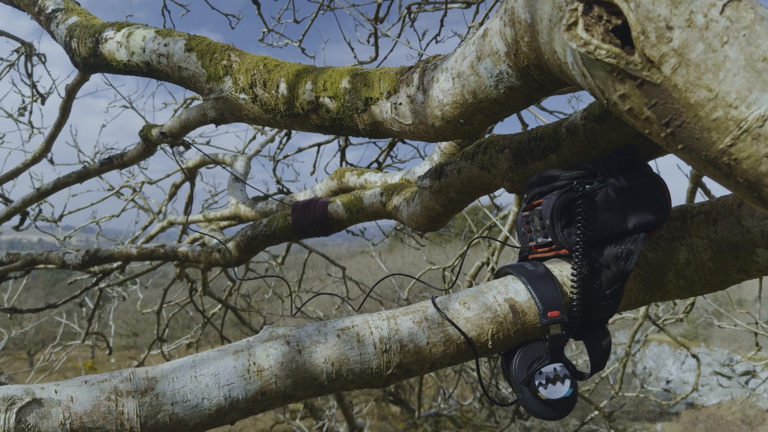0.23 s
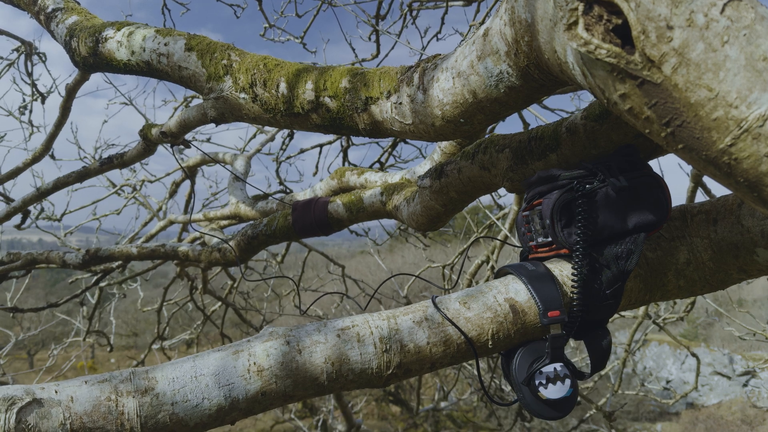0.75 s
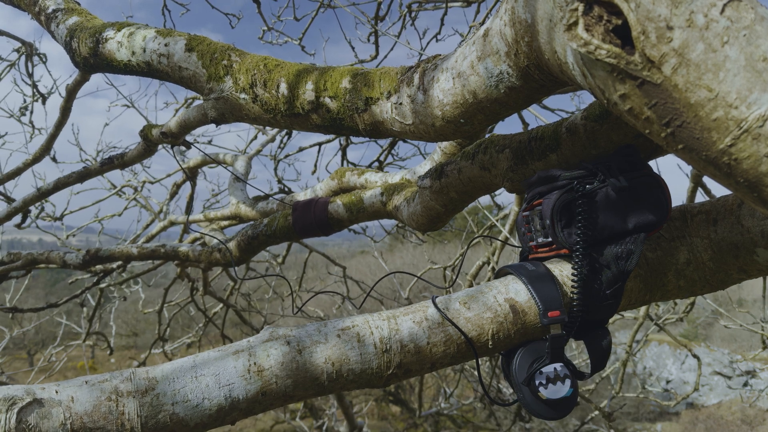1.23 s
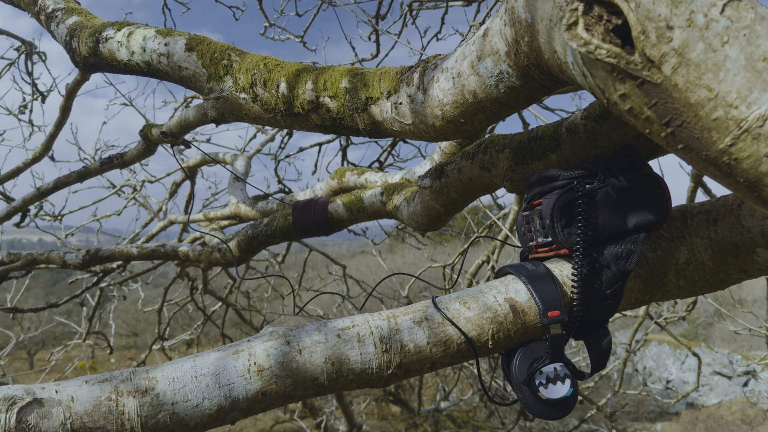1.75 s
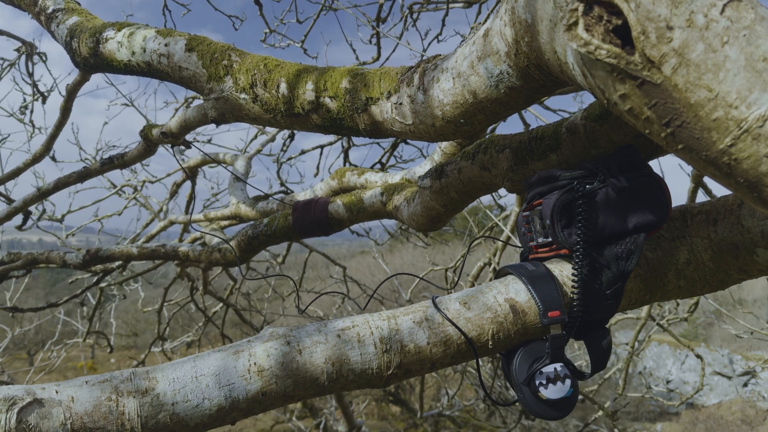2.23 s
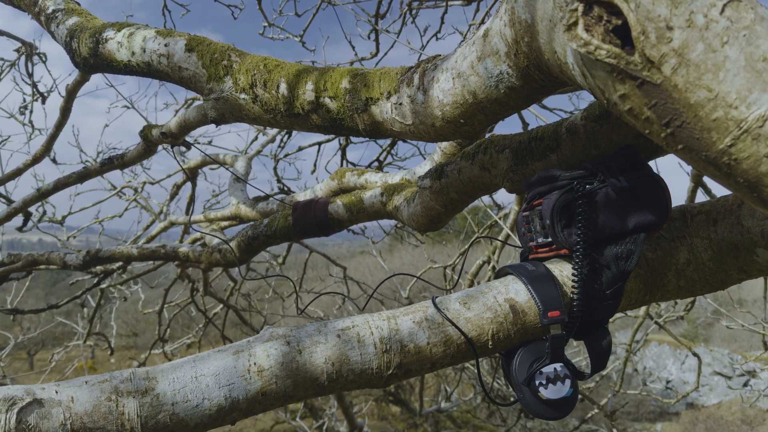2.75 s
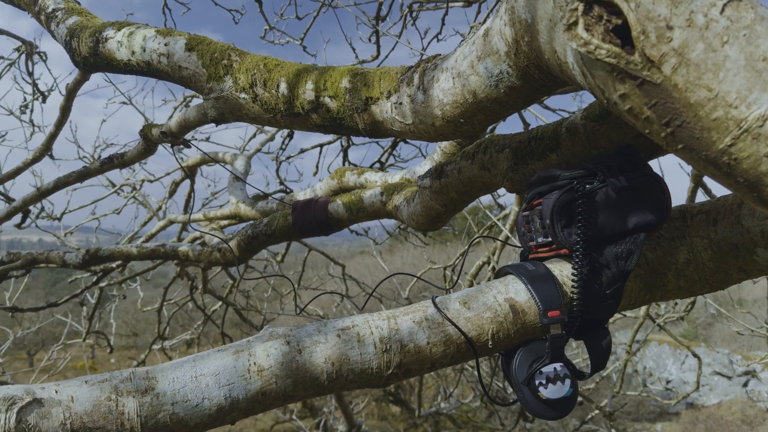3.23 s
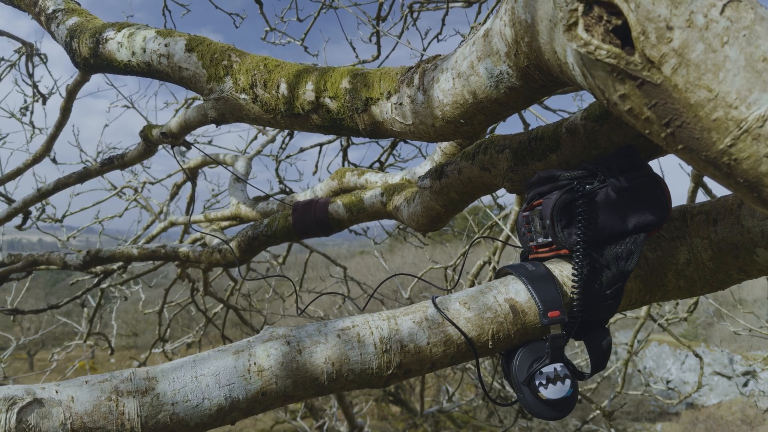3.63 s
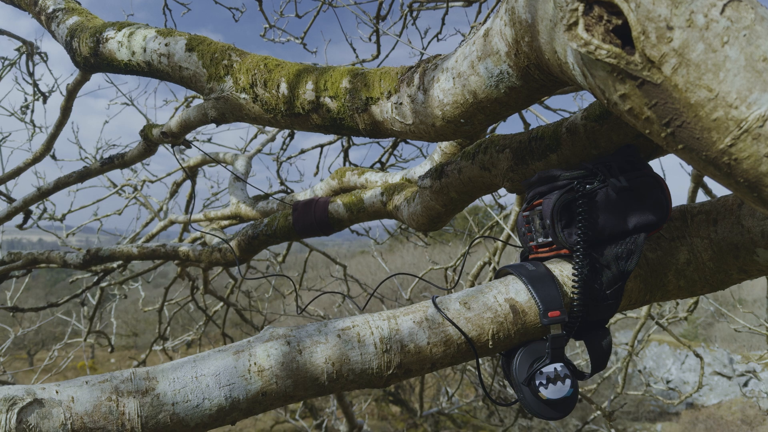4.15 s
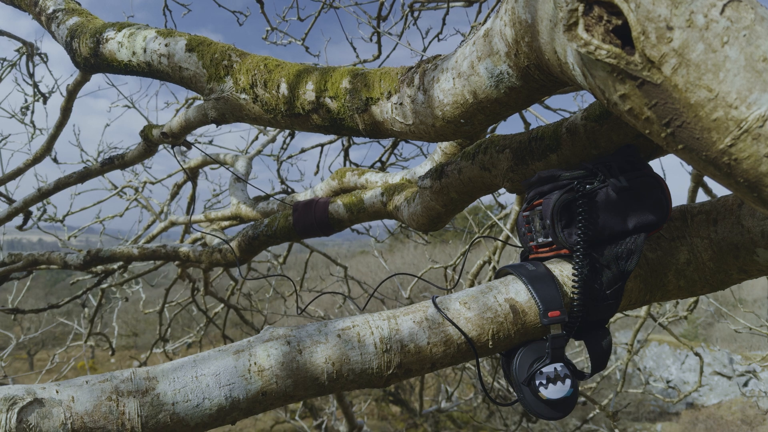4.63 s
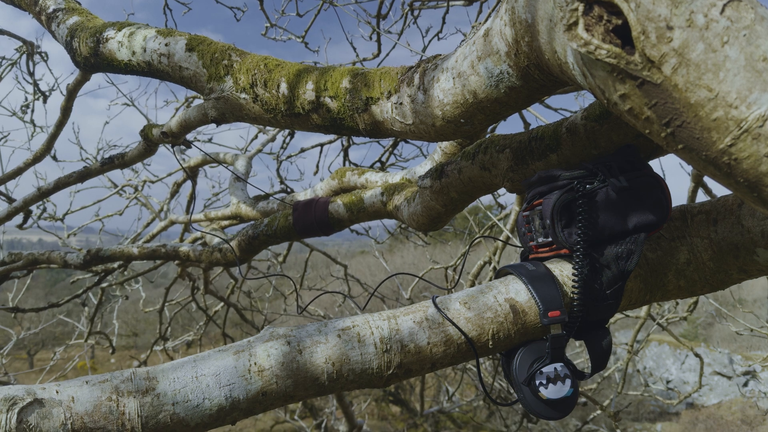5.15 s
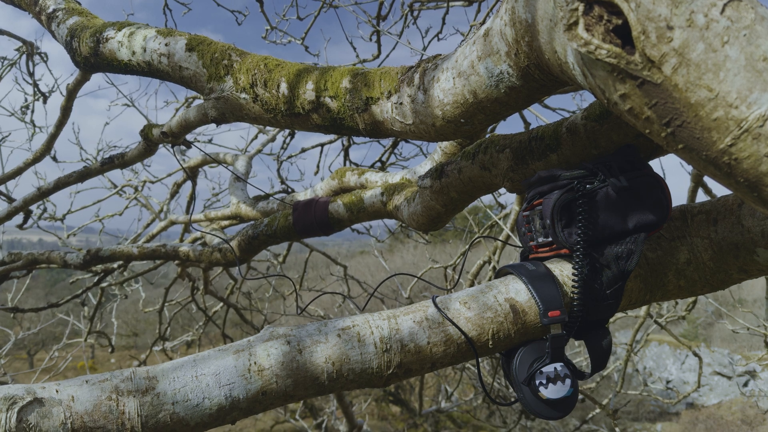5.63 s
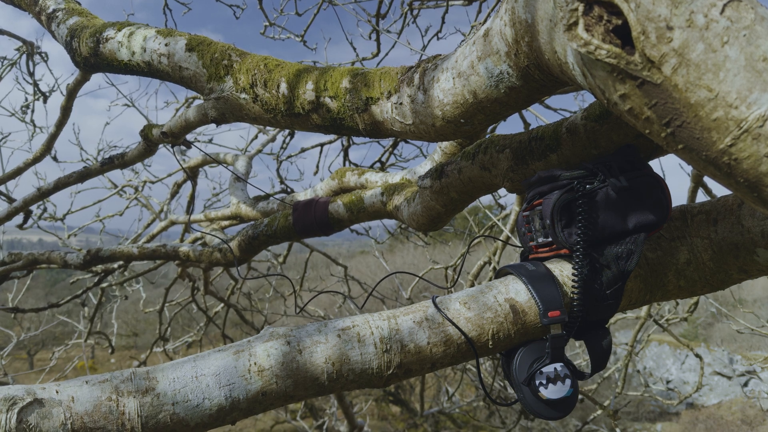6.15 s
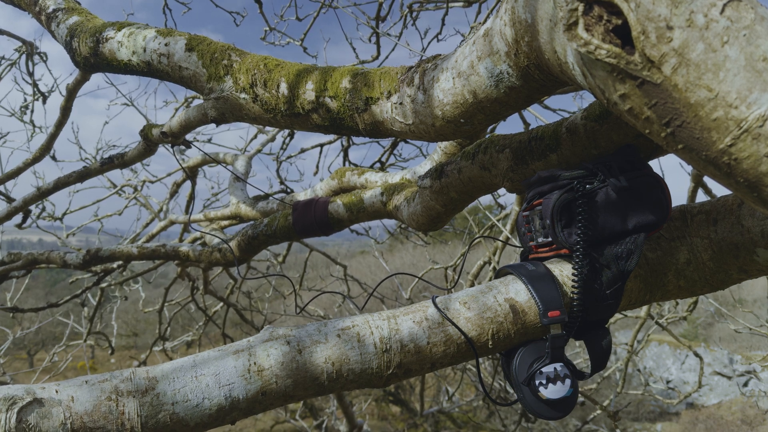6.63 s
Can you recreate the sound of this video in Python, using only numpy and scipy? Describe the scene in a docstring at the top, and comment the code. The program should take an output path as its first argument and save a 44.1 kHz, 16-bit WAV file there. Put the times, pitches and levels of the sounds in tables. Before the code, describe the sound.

A tree branch in gusty wind, heard through the wood: hollow twig knocks and rattles over a dull low rumble, gradually fading.

```python
"""Twigs knock and scrape over a low rumble: a branch in gusty wind, through a contact microphone.
Turbulent air bends the limb; twigs ring the wood's modes and air drags over the bark.
The microphone's strap ticks now and then, over faint amplifier hiss and whine.
A limiter catches the hardest knock, and the whole sound fades towards the end."""
import sys
import numpy as np
from scipy import signal
from scipy.io import wavfile
from scipy.ndimage import uniform_filter1d, minimum_filter1d

SR = 44100
rng = np.random.default_rng(int(sys.argv[2]) if len(sys.argv) > 2 else 0)


def waveform_to_disk(signal):
    """Save audio, clipped to [-1, 1], as 16-bit WAV at the path in sys.argv[1]."""
    frames = np.transpose(np.atleast_2d(signal))
    scaled = np.clip(frames, -1, 1) * 32767
    samples = np.round(scaled).astype(np.int16)
    wavfile.write(sys.argv[1], SR, samples)


N = 304290


def gain_of(db):
    return 10 ** (np.asarray(db) / 20)


def unit_rms(x):
    return x / np.sqrt(np.mean(x ** 2) + 1e-20)


def at_peak(x, db):
    return gain_of(db) * x / abs(x).max()


def curve(rows):
    """(time [s], value) rows interpolated to every sample."""
    return np.interp(np.arange(N) / SR, *np.transpose(rows))


def add(mix, start_s, sound):
    part = mix[round(start_s * SR):][:len(sound)]
    part += sound[:len(part)]


def smooth(x, span_s):
    span = round(span_s * SR)
    return uniform_filter1d(uniform_filter1d(x, span), span)


def steadied(x, span_s):
    """Evens out level swings slower than span_s; rms 1."""
    power = smooth(x ** 2, span_s)
    return unit_rms(x / np.sqrt(abs(power) + .05))


def noise(spectrum, patchy_db=0., size=1024):
    """Coloured noise with patches drifting in time and frequency; rms 1."""
    bin_hz = np.fft.rfftfreq(size, 1 / SR)
    hz, db = np.transpose(spectrum)
    real, imag, patches = rng.standard_normal((4 * N // size + 5, len(bin_hz), 3)).T
    patches = unit_rms(uniform_filter1d(uniform_filter1d(patches, 6, axis=0), 6, axis=1))
    colour_db = np.interp(np.log(bin_hz + 1), np.log(hz + 1), db, left=-120, right=-120)
    frames = (real + 1j * imag) * gain_of(colour_db[:, None] + patchy_db * patches)
    return unit_rms(signal.istft(frames, nperseg=size, noverlap=3 * size // 4)[1][:N])


def ring(modes, spread_db, samples=8000):
    """Decaying sines, low-passed above the top mode; the strike point randomises sign and size."""
    t = np.arange(samples) / SR
    hz, db, t60_s = np.transpose(modes)[:, :, None]
    luck = rng.standard_normal((len(modes), 2))
    envelopes = gain_of(db + spread_db * luck[:, :1] - 60 * t / t60_s)
    sound = (np.sign(luck[:, 1:]) * envelopes * np.sin(2 * np.pi * hz * t)).sum(0)
    return signal.sosfilt(signal.butter(6, 1.225 * hz.max(), fs=SR, output="sos"), sound)


# Hiss spectrum: (frequency [Hz], relative density [dB])
HISS_SPECTRUM = [(880, -27), (1500, 1), (1840, -1), (3000, -4), (4280, -8), (5800, -7.5), (6900, -5.5),
                 (7900, -8.5), (14700, -8.5), (16000, -9)]
# Whine harmonics 6-11: (rms before fade [dB])
WHINE_HARMONICS_DB = [-99, -98, -98.5, -96.5, -100, -99]
# Fade of hiss and whine: (time [s], gain [dB])
AMPLIFIER_FADE = [(0, 5), (4.5, 4), (6.9, -2)]


def amplifier(hiss_db=-71, whine_hz=500):
    """Electrical hiss and thin tones, sinking towards the end."""
    t = np.arange(N) / SR
    whine = sum(np.sqrt(2) * gain_of(db) * np.sin(2 * np.pi * (k * whine_hz * t + rng.random()))
                for k, db in enumerate(WHINE_HARMONICS_DB, start=6))
    hiss = gain_of(hiss_db) * noise(HISS_SPECTRUM, patchy_db=1.5)
    return gain_of(curve(AMPLIFIER_FADE)) * (hiss + whine)


# Rustle envelope: (time [s], level [dB])
RUSTLE_LEVEL = [(.08, -95), (.13, -74), (.2, -65.5), (.27, -66.5), (.36, -81), (.45, -94)]
# Rustle spectrum: (frequency [Hz], relative density [dB])
RUSTLE_SPECTRUM = [(2500, -4.5), (4000, -9), (6800, -2.5), (8500, -22.5), (12000, -49.5)]


def rustle():
    """A faint, high puff of noise in the first half second."""
    return gain_of(curve(RUSTLE_LEVEL)) * noise(RUSTLE_SPECTRUM, patchy_db=1, size=256)


# Taps: (time [s], peak [dB], pitch [Hz])
HARD_TAPS = [(0.3146, -42.5, 2440), (1.2959, -42, 2420), (1.8155, -45, 2410), (2.1665, -44.5, 3210),
             (2.3719, -44, 2440), (2.7241, -52, 2470), (3.5407, -39, 2370), (3.7978, -57, 2270),
             (3.9408, -53, 2740), (5.3357, -54, 2100), (5.7583, -59, 2190)]


def taps(attack_s=.00063, t60_s=.02):
    """A small hard part taps, ringing one short high mode."""
    out, t = np.zeros(N), np.arange(2000) / SR
    attack = np.sin(np.pi / 2 * np.minimum(t / attack_s, 1)) ** 2
    for time_s, db, hz in HARD_TAPS:
        tap = attack * ring([(hz, 0, t60_s)], spread_db=2, samples=len(t))
        add(out, time_s - .001, at_peak(tap, db))
    return out


# Sensor ring and woody bite: (frequency [Hz], relative level [dB], t60 [s])
SENSOR_MODES = [(6960, 6.5, 0.0056), (9180, -0.5, 0.0043)]
BITE_MODES = [(3900, 13, 0.0027), (4550, -1, 0.0077)]
# Ticks: (time [s], sensor peak [dB], click re sensor [dB], bite re sensor [dB])
STRAP_TICKS = [(0.682, -33, -13, -23), (0.6934, -52, -5, -17), (0.7225, -43.5, 4, -14),
               (0.7304, -44, -3, -7), (1.332, -50, -5, -28), (1.374, -29, -8, -32), (1.446, -39, -5, -10),
               (2.1474, -65, 2, -11.5), (2.2487, -50.5, -5, -26), (2.2644, -54, -10, -15),
               (2.3077, -51, -5, -22), (2.4864, -38.5, -7, -8), (2.5008, -39, -10, -30),
               (3.3844, -52, -7, -20), (3.476, -51.5, -10, -30), (3.8402, -47.5, 8, -5),
               (4.797, -47, -8, -2), (4.809, -52, 13, -15), (4.8546, -45, 8.5, -24), (5.7997, -57, -3, -21),
               (5.9732, -55, -5, -13)]


def strap_ticks(samples=2000):
    """The strap ticks: a wideband click, a woody bite and the sensor's ring."""
    out = np.zeros(N)
    click_band = signal.butter(2, [1800, 14500], "band", fs=SR, output="sos")
    click = signal.sosfilt(click_band, signal.unit_impulse(samples))
    for time_s, db, click_db, bite_db in STRAP_TICKS:
        sensor = ring(SENSOR_MODES, spread_db=5.5, samples=samples)
        bite = ring(BITE_MODES, spread_db=5, samples=samples)
        tick = at_peak(sensor, db) + at_peak(click, db + click_db) + at_peak(bite, db + bite_db)
        add(out, time_s + .00081, tick)
    return out


# Wood modes, 8 parts, thick to thin, each a list of (frequency [Hz], relative level [dB], t60 [s])
WOOD_PARTS = [
    [(199.1, -4, 0.12), (237.5, -6, 0.17)],
    [(294.3, -1.5, 0.082), (362.4, -2, 0.16), (402.4, -1, 0.081)],
    [(479.3, 4.5, 0.094)],
    [(548.5, 0, .13)],
    [(716, -2.5, 0.047), (779, -3.5, 0.071), (820.4, -3.5, 0.042)],
    [(1059, 5.5, 0.066), (1178, 6.5, 0.05)],
    [(1331, -1.5, .045), (1410, -1, 0.031)],
    [(1698, 6.5, 0.02), (1870, -6, 0.047)],
]
# Rattle drive per part: (relative level [dB])
RATTLE_DRIVE_DB = [-1.5, -2, -6.5, -5.5, -7, -34.5, -25, -37]
# Air on bark: (frequency [Hz], relative density [dB])
BARK_AIR_SPECTRUM = [(190, -38.5), (320, -12), (361, -1.5), (544, -2.5), (650, -8), (772, -1.5), (830, -9),
                     (1000, -25), (1400, -38.5), (1840, -46), (3500, -59), (5500, -68.5), (6900, -57),
                     (8200, -64.5), (10000, -94)]
# Wind strength, drives rattle and groan: (time [s], level [dB])
WIND_LEVEL = [(0.0, -31), (0.27, -32.5), (0.35, -31), (0.92, -34), (1.09, -34.5), (1.32, -35), (1.52, -31),
              (1.84, -35), (2.56, -36), (3.02, -40.5), (3.71, -38.5), (3.86, -39.5), (4.24, -43.5),
              (4.59, -43.5), (5.09, -45.5), (5.73, -47.5), (6.07, -51.5), (6.42, -44.5), (6.59, -53),
              (6.9, -53)]


def twig_rattle(hits_per_s=250, flurry_db=2.5, flurry_s=.03):
    """Wind shakes small twigs against the wood in flurries and drags over the bark."""
    wood = np.zeros(N)
    for modes, db in zip(WOOD_PARTS, RATTLE_DRIVE_DB):
        for mode in modes:
            size, chance = rng.random((N, 2)).T
            strength = gain_of(-3.2 * np.log(size + .011))  # many soft, a few hard
            hits = strength * (chance < hits_per_s / SR)
            wood += gain_of(db) * signal.oaconvolve(hits - hits.mean(), ring([mode], spread_db=5))[:N]
    flurries = unit_rms(smooth(rng.standard_normal(N), flurry_s))
    envelope = gain_of(curve(WIND_LEVEL) + flurry_db * flurries)
    air = noise(BARK_AIR_SPECTRUM, patchy_db=5.5)
    return envelope * (gain_of(-1) * unit_rms(wood) + gain_of(-3.5) * air)


# Limb spectra: (frequency [Hz], relative density [dB])
SWAY_SPECTRUM = [(8, 1), (26, 4.5), (40, 5.5), (52, -26), (70, -44)]
SHUDDER_SPECTRUM = [(40, -28.5), (56, -19), (68, 2), (80, -1), (100, -5), (110, -3.5), (119, 6), (128, -4),
                    (140, -7.5), (160, -8.5), (200, -32)]
GROAN_SPECTRUM = [(88, -46.5), (150, 3.5), (215, 0), (320, -13), (420, -49.5), (700, -120)]
# Slow bending and faster shudder: (time [s], level [dB])
SWAY_LEVEL = [(0.0, -52), (0.09, -18.5), (0.15, -26), (0.48, -21), (0.52, -33), (0.88, -21.5), (1.04, -43),
              (1.31, -28), (1.4, -36), (1.44, -19.5), (1.54, -40), (1.71, -22), (1.77, -32.5), (2.13, -36),
              (2.25, -17.5), (2.48, -37), (2.71, -24), (2.82, -36), (3.15, -40), (3.19, -30.5), (3.63, -41),
              (3.67, -26.5), (3.82, -43), (3.88, -26.5), (4.11, -39), (4.59, -33.5), (4.78, -42.5),
              (5.94, -44), (6.09, -37), (6.9, -41.5)]
SHUDDER_LEVEL = [(0.0, -26), (0.33, -27.5), (1.25, -28), (1.65, -24), (1.67, -33.5), (1.84, -26.5),
                 (1.92, -34.5), (2.29, -22), (2.38, -35), (2.61, -23.5), (2.73, -35), (2.84, -28.5),
                 (3.15, -37), (3.27, -27), (3.5, -36), (3.55, -26), (3.98, -35.5), (4.57, -33),
                 (4.77, -42.5), (4.88, -29.5), (4.94, -38.5), (5.25, -43), (5.4, -31), (5.51, -38.5),
                 (6.27, -44), (6.53, -33), (6.67, -43.5), (6.9, -38.5)]


def limb():
    """Turbulent air bends the limb: it sways, shudders and groans."""
    sway = gain_of(curve(SWAY_LEVEL)) * steadied(noise(SWAY_SPECTRUM, size=8192), span_s=.091)
    shudder = gain_of(curve(SHUDDER_LEVEL)) * steadied(noise(SHUDDER_SPECTRUM, size=8192), span_s=.057)
    groan_db = -39.5 + 1.5 * (curve(WIND_LEVEL) + 40)
    groan = gain_of(groan_db) * noise(GROAN_SPECTRUM, patchy_db=3, size=2048)
    return sway + shudder + groan


def twig_contact(rise_ms, hold_ms, parts, peaks_db, slips_per_s):
    """A first touch, then random slips building to a main blow and trailing off; all ring the wood."""
    ms = np.arange(4000) / SR * 1000
    size, chance = rng.standard_normal(len(ms)), rng.random(len(ms))
    blow_ms, trail_ms = max(rise_ms - 5, 0), max(.93 * hold_ms - 2, 1)
    build = .49 + .99 * ms / (blow_ms + 1e-3)
    trail = np.exp(-((ms - blow_ms) / trail_ms) ** 2)
    force = np.where(ms < blow_ms, build, trail)
    slips = .7 * size * force * (chance < slips_per_s / SR)
    slips[0] = .75  # first touch
    slips[round(blow_ms * SR / 1000)] = 1
    return sum(at_peak(signal.fftconvolve(slips, ring(modes, spread_db=.5)), db)
               for modes, db in zip(parts, peaks_db))


# Clacks: (time [s], contact [ms], middle part's peak [dB], tilt per thinner part [dB])
TIP_CLACKS = [(0.118, 8, -53, 6), (0.146, 6.8, -38.5, 0.5), (0.172, 21.6, -53, -11), (0.233, 4.2, -46, 2),
              (0.402, 16, -34.5, -1.5), (0.63, 17, -36, -5), (0.734, 7, -52, 3.5), (0.818, 12, -53, 3),
              (0.881, 27, -43.5, -4), (0.941, 7, -47.5, 0.5), (1.136, 6.4, -54, 6), (1.232, 23, -50, -4.5),
              (1.299, 13, -60, -8), (1.336, 17, -49.5, -5), (1.435, 14, -51, 2), (1.76, 17, -55, -13),
              (2.1673, 5.8, -23.5, 2), (2.257, 14, -45, -1), (2.277, 8.4, -34.5, -4), (2.287, 12, -52, -16),
              (2.47, 8.4, -49, 7), (2.578, 11.5, -44.5, -4), (2.675, 8.8, -47, -3), (2.698, 11.5, -45, -4),
              (2.727, 17.6, -43.5, -4.5), (3.015, 7, -59, -2), (3.189, 18, -57, 2), (3.22, 11, -51, -5),
              (3.278, 23, -45, -5), (3.305, 14, -57, 0), (3.54, 10, -55.5, 2.5), (3.655, 10, -54, -7),
              (3.744, 16, -54.5, 0), (3.796, 13, -53, -2), (3.943, 9.4, -54, 9), (4.197, 20, -55.5, 3),
              (4.488, 9, -47, -1), (5.337, 3.3, -43.5, 0)]


def tip_clacks():
    """Hard twig tips ring the three thin parts of the wood."""
    out = np.zeros(N)
    for time_s, contact_ms, db, tilt_db in TIP_CLACKS:
        peaks_db = db - tilt_db, db, db + tilt_db
        clack = twig_contact(.48 * contact_ms, contact_ms, WOOD_PARTS[5:], peaks_db, slips_per_s=650)
        add(out, time_s, clack)
    return out


# Gains by strike spot: (deep thud [dB], thud [dB], low hollow note [dB], high hollow note [dB])
SPOT_GAINS_DB = {"base": [0.5, -22, -6.5, -4.5], "low": [-12.5, -13.5, 2, -8.5], "high": [-29.5, -11.5, -10,
                 -0.5], "fork": [-14.5, -13.5, 0.5, 4], "side": [-6.5, -5, -15.5, -12], "broad": [-0.5, -3,
                 -2, -13.5], "bend": [-10.5, -6, -22, 0]}
# Knocks: (time [s], rise [ms], hold [ms], spot, ring peak before spot gain [dB], dry knock peak [dB])
TWIG_KNOCKS = [(0.006, 8.5, 8.4, "side", -17, -23), (0.162, 4, 6.1, "low", -13.5, -26),
               (0.18, 4, 7.4, "low", -21, -15.5), (0.205, 20, 14, "fork", -19.5, -26.5),
               (0.244, 12, 22, "base", -16, -21.5), (0.288, 20, 35.4, "fork", -14.5, -24.5),
               (0.403, 5.2, 40, "side", -17, -23), (0.518, 16, 16, "low", -24, -22),
               (0.549, 24, 29, "low", -29, -33), (0.66, 14.3, 21, "broad", -21, -28),
               (0.733, 7.3, 8.6, "broad", -18.5, -22.5), (0.779, 8.1, 14, "base", -23.5, -36),
               (0.827, 9.1, 13, "side", -17, -21), (0.898, 3.9, 6.7, "high", -11, -22.5),
               (0.927, 11.8, 22, "low", -18.5, -28.5), (0.96, 8, 20, "high", -18.5, -46),
               (1.014, 15, 26, "fork", -28, -32), (1.159, 5.4, 9, "bend", -31, -23.5),
               (1.296, 6.9, 5.4, "base", -18.5, -21), (1.352, 12.8, 53, "side", -17, -29),
               (1.45, 16, 16, "base", -25, -42), (1.477, 6.06, 11, "fork", -22.5, -27),
               (1.617, 17.3, 18, "high", -15, -28), (1.68, 12, 5.1, "low", -20.5, -29.5),
               (1.817, 5.5, 6, "base", -13.5, -21), (2.094, 7.9, 7.8, "side", -19.5, -33.5),
               (2.1705, 5.5, 4.5, "broad", -6, -1), (2.258, 8.4, 15, "side", -21, -21),
               (2.276, 8.8, 26, "low", -18.5, -17), (2.372, 6.2, 8.7, "base", -23, -27),
               (2.573, 12.4, 23, "broad", -21.5, -22), (2.682, 13, 34, "base", -29.5, -26.5),
               (2.72, 8, 39, "fork", -29.5, -28), (3.017, 4.1, 8.6, "side", -46, -55),
               (3.192, 10.6, 9.5, "broad", -26.5, -28.5), (3.217, 13, 16, "side", -20.5, -30),
               (3.283, 6.8, 7.2, "side", -21, -22.5), (3.316, 8.3, 28, "side", -30, -25),
               (3.486, 6, 15, "bend", -24, -21), (3.54, 6.5, 26, "base", -12.5, -24),
               (3.643, 16.5, 17, "bend", -26.5, -23.5), (3.752, 6.6, 27, "bend", -28, -30),
               (3.803, 6, 29, "low", -20, -27), (3.946, 6.56, 7.4, "broad", -18.5, -21),
               (3.982, 5.7, 21, "low", -21.5, -26.5), (4.054, 17.7, 4, "side", -23, -30),
               (4.174, 48, 13, "fork", -20.5, -24.5), (4.49, 8.7, 21, "high", -28, -22),
               (4.54, 16, 9.1, "bend", -31.5, -27.5), (4.622, 6, 6.2, "high", -19, -25.5),
               (4.645, 27, 9.9, "broad", -32, -31.5), (4.74, 8, 22, "bend", -34, -33),
               (4.837, 9, 33, "side", -35, -37.5), (4.889, 7.6, 5.6, "high", -29.5, -38.5),
               (4.954, 4, 39, "bend", -37.5, -32), (5.338, 4, 5.5, "broad", -27, -34.5),
               (5.428, 10, 20.3, "high", -27, -37.5), (5.5, 4.4, 7, "base", -37, -57),
               (5.629, 6, 15.3, "bend", -34, -29.5), (5.807, 42, 7.1, "bend", -36, -38.5),
               (5.86, 8, 20, "bend", -33.5, -39.5), (6.122, 9.7, 20, "bend", -38, -39),
               (6.248, 8.4, 16, "bend", -41, -43), (6.504, 9.1, 21, "high", -37, -65),
               (6.585, 6.7, 17, "low", -35, -33.5), (6.751, 25, 16, "side", -30.5, -38),
               (6.847, 6.4, 21, "side", -27.5, -31.5)]


def twig_knocks():
    """Twigs strike and scrape the thick wood: four parts ring by spot, a fifth gives the dry knock."""
    out = np.zeros(N)
    for time_s, rise_ms, hold_ms, spot, ring_db, dry_db in TWIG_KNOCKS:
        peaks_db = [ring_db + db for db in SPOT_GAINS_DB[spot]] + [dry_db]
        knock = twig_contact(rise_ms, hold_ms, WOOD_PARTS[:5], peaks_db, slips_per_s=900)
        add(out, time_s - .0015, knock)
    return out


def scene():
    """All sources summed to mono."""
    branch = rustle() + limb() + twig_rattle() + twig_knocks() + tip_clacks() + taps()
    return (branch + strap_ticks() + amplifier())[None]


def record(dry, threshold_db=-3, slope=.7, cutoff_hz=15800):
    """A look-ahead limiter dips everything around the hardest knock; a low-pass follows."""
    over_db = np.maximum(20 * np.log10(abs(dry) + 1e-9) - threshold_db, 0)
    held_db = minimum_filter1d(-over_db, size=1900, origin=-100)  # 43 ms hold
    limited = dry * gain_of(slope * uniform_filter1d(held_db, size=400))
    lowpass = signal.firwin(1023, cutoff_hz, window=("kaiser", 9), fs=SR)
    return signal.oaconvolve(limited, lowpass[None], "same")


dry = scene()
out = record(dry)
waveform_to_disk(out)
```